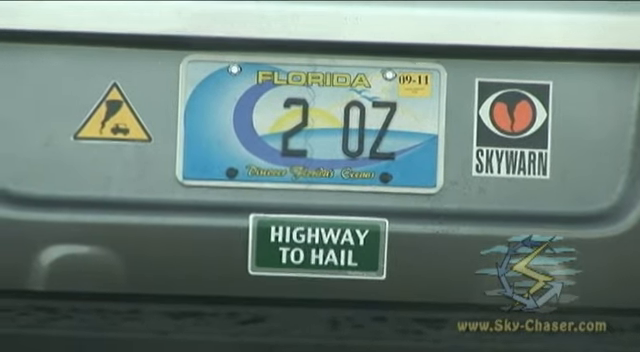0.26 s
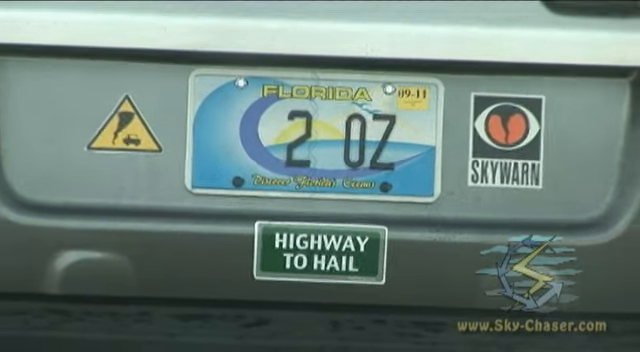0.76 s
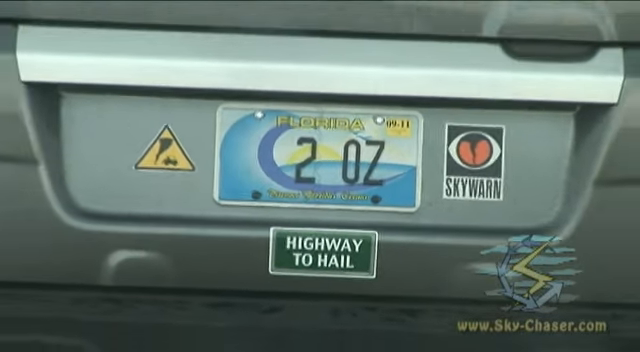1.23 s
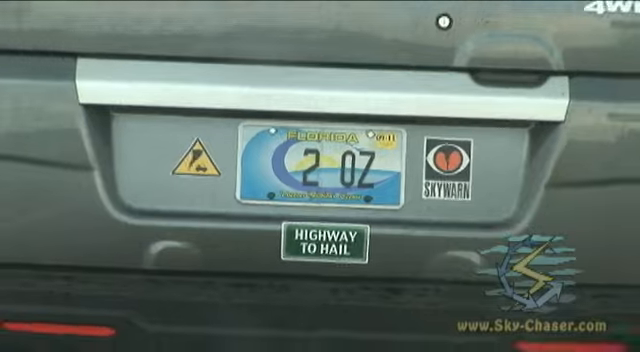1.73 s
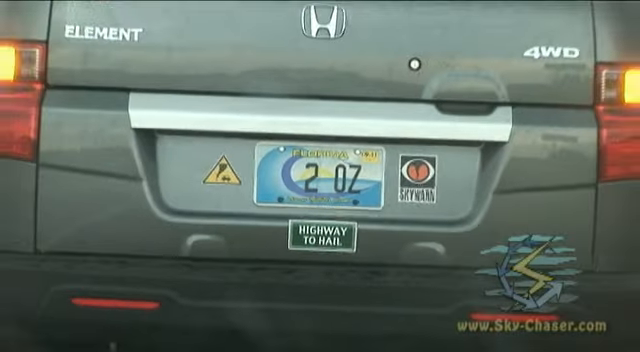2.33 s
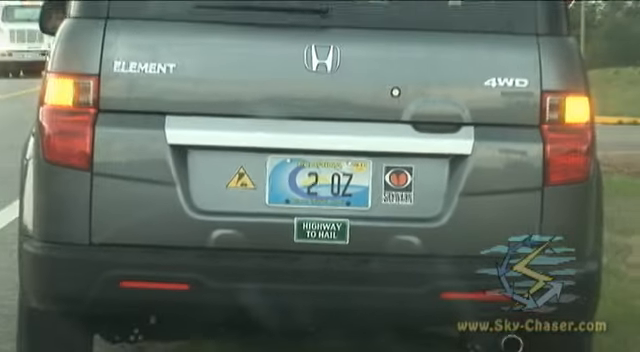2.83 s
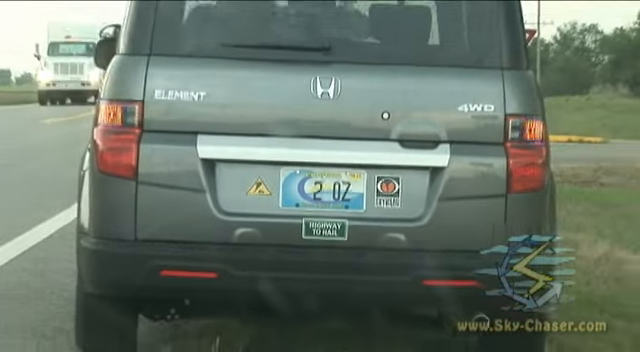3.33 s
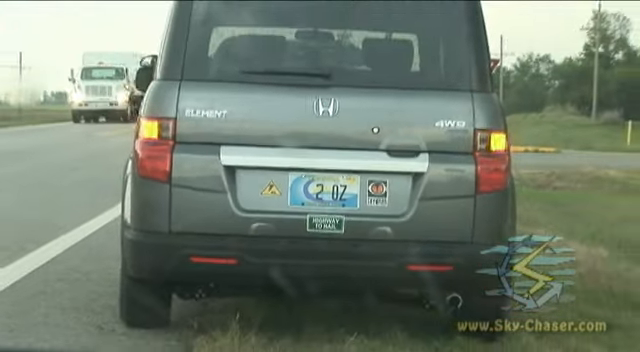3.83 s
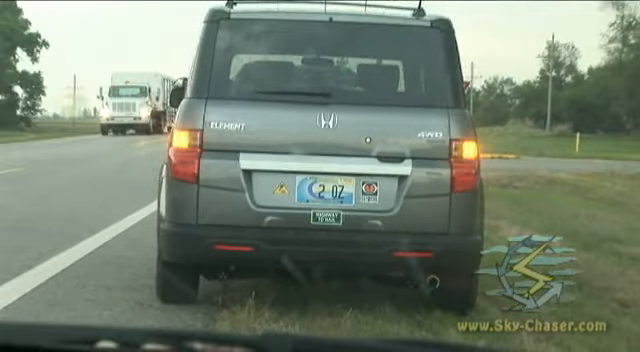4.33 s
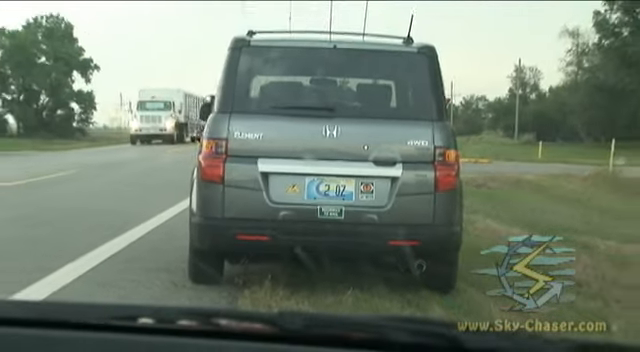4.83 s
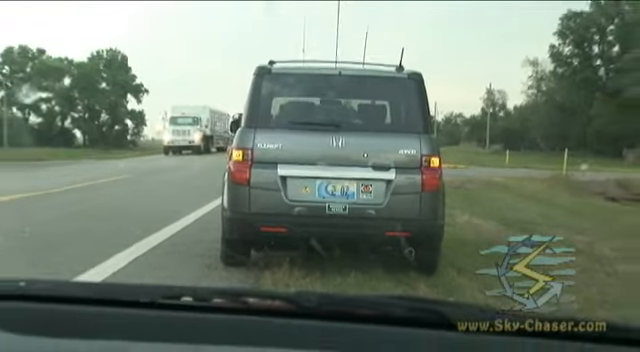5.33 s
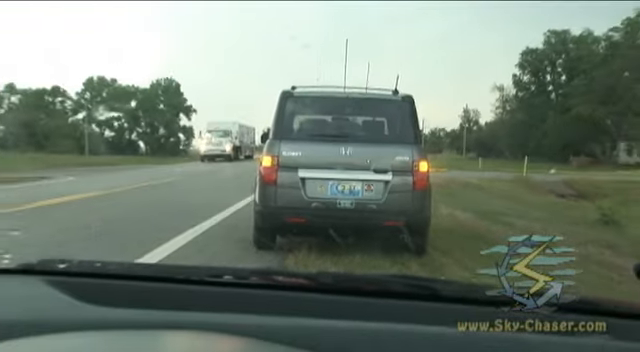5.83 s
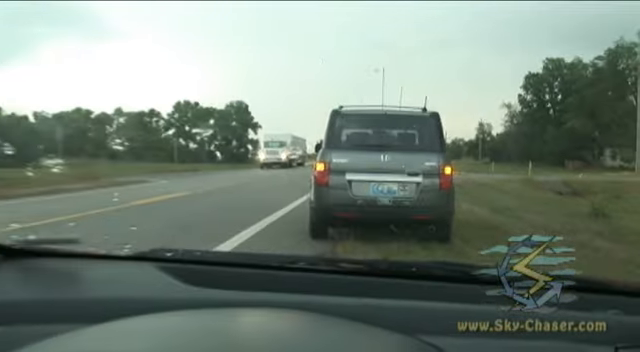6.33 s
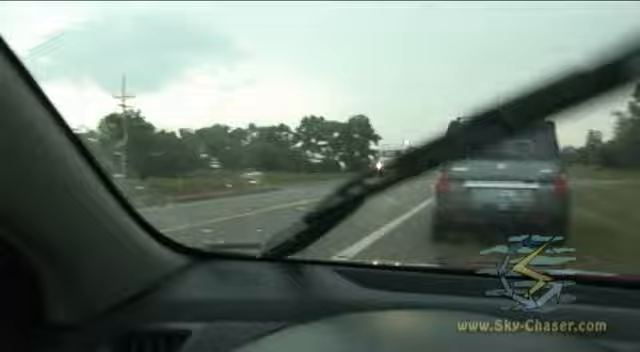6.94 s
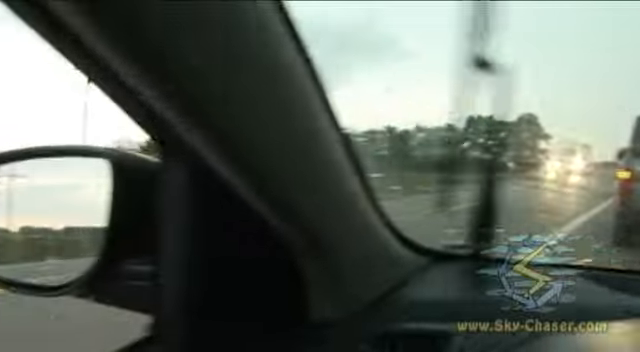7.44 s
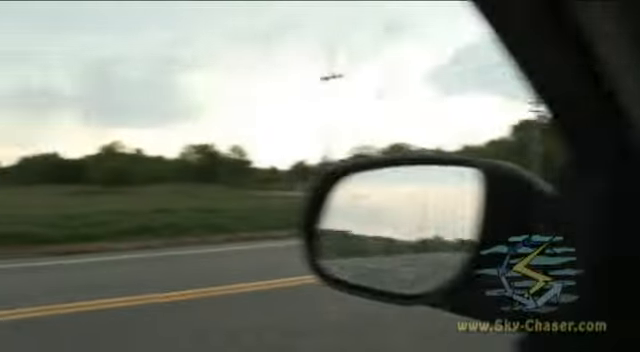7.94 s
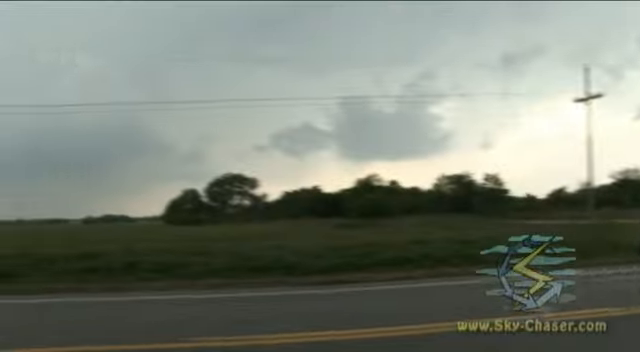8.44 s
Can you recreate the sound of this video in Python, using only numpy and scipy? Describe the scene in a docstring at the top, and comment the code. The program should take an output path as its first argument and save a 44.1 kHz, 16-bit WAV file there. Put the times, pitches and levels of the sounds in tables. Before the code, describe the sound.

From the driver's seat of an idling car, a quiet low engine drone and thin hiss run throughout, the drone rising slightly until about 5 s. Sparse heavy raindrops strike the roof from 0.25 s, each a hollow low thump of about a tenth of a second with a noisy edge, above softer drumming. Short crisp taps and tiny bright ticks scatter over the windshield. Roof hits cluster near 3 s and between 3.6 and 5.3 s; a strong glass tap lands at 5.1 s. At 6.7 s the wiper starts with a dull thud; at 7.4 s it reverses with a heavier, sinking thud and a clack. From 7 to 8 s the microphone turns to the side window and an oncoming truck's broad tyre noise swells gently. At 7.97 s a fat drop smacks the window frame, by far the loudest event, cracking and spattering briefly. Light taps continue to 8.7 s.

```python
"""Shower on an idling car

Inside a car on a road shoulder, over engine drone, sparse heavy drops ring the roof with low modes and
noisy overtones; taps on the windshield pair splashes of noise with two modes, among fine treble ticks.
The wiper thuds as it starts, thuds and clacks as it turns round; a fat drop smacks the frame and spatters.
The tyres of an oncoming truck, coloured noise, swell as the microphone turns to the side window."""
import sys
import numpy as np
from scipy import signal
from scipy.fft import rfft, irfft
from scipy.io import wavfile
from scipy.ndimage import uniform_filter1d

SR = 44100
rng = np.random.default_rng(int(sys.argv[2]) if len(sys.argv) > 2 else 0)


def generate_wav(sig):
    """Save sig (samples, or channels by samples) to the path in sys.argv[1] as 16-bit PCM at SR."""
    pcm = np.round(np.clip(np.atleast_2d(sig).T, -1, 1) * 32767).astype(np.int16)
    wavfile.write(sys.argv[1], SR, pcm)


N = 382788
TIME = np.arange(N) / SR  # seconds through the scene
AGE = np.arange(2 ** 14) / SR  # seconds since the start of one sound
# noisy overtones of the roof panel, also its edge: freq_hz, relative density_db (per Hz)
ROOF_OVERTONE_COLOUR = [(220, -5), (440, -9.5), (620, -19.5), (1300, -33.5), (3000, -65)]
TAP_RISE_SHARE = 0.047  # rise time as a share of t60: short taps snap


def undb(db):
    """Decibels to amplitude gain."""
    return 10 ** (np.asarray(db) / 20)


def curve(rows, at):
    """Straight lines through a two-column table."""
    return np.interp(at, *np.transpose(rows))


def gains(points, size):
    """Gain at each FFT bin from (freq_hz, level_db) points, falling 10 dB per octave beyond them."""
    hz, db = np.transpose(points)
    bin_hz = np.fft.rfftfreq(size, 1 / SR)
    octave, known = np.log2(np.maximum(bin_hz, 1)), np.log2(hz)
    octaves_outside = abs(octave - np.clip(octave, known[0], known[-1]))
    return undb(np.interp(octave, known, db) - 10 * octaves_outside)


def colour(x, points, size=4096):
    """Minimum-phase filter of the given colour: being causal, it keeps attacks sharp."""
    cepstrum = irfft(np.log(gains(points, size)))[:size // 2]
    cepstrum[1:] *= 2  # fold the spectrum's phase to minimum phase
    response = irfft(np.exp(rfft(cepstrum, size)))[:size // 2]
    return signal.oaconvolve(x, response[None], axes=1)[:, :x.shape[1]]


def level(x, db):
    """Set the rms level."""
    return x * undb(db) / np.sqrt(np.mean(x ** 2))


def peak(x, db, size=128):
    """Set the rms level of the loudest few milliseconds, judged on the first channel."""
    power = uniform_filter1d(np.atleast_2d(x)[0] ** 2, size)
    return x * undb(db) / np.sqrt(power.max())


def fade(t60):
    """Exponential decay by 60 dB in t60 seconds."""
    return np.exp(-np.log(1000) * AGE / t60)


def burst(t60, tail_db=-40, tail_t60=0.13, rise_s=0.000083, size=6000):
    """A contact spreading through a panel: mid and side noise with a quick decay and a faint tail."""
    decay = fade(t60) + undb(tail_db) * fade(tail_t60)
    shape = decay * (1 - np.exp(-AGE / rise_s))
    return rng.standard_normal((2, size)) * shape[:size]


def ring(hz, t60, rise_s):
    """One sine mode that builds up and dies away."""
    return np.sin(2 * np.pi * hz * AGE) * fade(t60) * (1 - np.exp(-(AGE / rise_s) ** 2))


def add(out, s, sound):
    """Mix a sound in at a time in seconds."""
    start = max(int(s * SR), 0)
    out[:, start:start + sound.shape[-1]] += sound[..., :N - start]


def patter(strike, spread_db, count, size=10):
    """Drops of random strength fall at random times on a few spots, each with its own response."""
    out = np.zeros((2, N))
    spots = [peak(strike(), 0) for _ in range(size)]
    weights = undb(spread_db * np.clip(rng.standard_normal(count), -2, 2))
    for k, s in enumerate(rng.random(count) * TIME[-1]):
        add(out, s, spots[k % size] * weights[k])
    return out


def turned(s):
    """How far the microphone has turned to the side window, 0-1."""
    return np.interp(s, (6.9, 8), (0, 1))


def surroundings():
    """Cabin drone and thin hiss as coloured noise; tyre noise grows as 1 / distance to the truck."""
    # engine drone in the cabin: freq_hz, relative density_db (per Hz)
    drone_colour = [(20, -28.5), (32, -1), (52, 0.5), (66, -9.5), (95, -4), (140, -8), (330, -19.5),
                    (700, -33), (6000, -70)]
    # drift of the drone: start_s, relative level_db
    rumble = [(0.0, -54.5), (2.2, -51.5), (5.1, -48), (6.3, -49), (8.68, -49.5)]
    # the truck's tyres: freq_hz, relative density_db (per Hz)
    tyre_colour = [(300, -0.5), (550, -1.5), (1100, -5.5), (1750, -3), (2350, -7.5), (2950, -12),
                   (3600, -15), (5800, -26.5), (7500, -43.5), (13000, -28)]
    # thin hiss: freq_hz, relative density_db (per Hz)
    hiss_colour = [(2000, 15), (3200, 2), (4300, 5), (5500, 6.5), (7200, -4), (9000, -1.5), (11000, 6.5),
                   (14500, 3), (15400, -16)]
    rumble_db = 9  # added to the drift
    truck_passes_s, truck_m_s, lane_m = 11.45, 16.2, 7.5  # when it would draw level, speed, nearest distance
    truck_db, turned_tyre_db = -44.5, 10  # tyres at the nearest distance; gain once the microphone has turned

    drone = level(colour(rng.standard_normal((2, N)), drone_colour), rumble_db)
    drone *= undb(curve(rumble, TIME))
    distance_m = np.hypot(truck_m_s * (TIME - truck_passes_s), lane_m)
    tyres = level(colour(rng.standard_normal((2, N)), tyre_colour), truck_db) * lane_m / distance_m
    tyres *= undb(turned_tyre_db * turned(TIME))
    hiss = level(colour(rng.standard_normal((2, N)), hiss_colour), -73.0)
    return drone + tyres + hiss


def droplets():
    """The tiniest drops are short noise ticks, high in the treble, over a fine patter of the same."""
    # tick colour: freq_hz, relative density_db (per Hz)
    tick_colour = [(3000, -21.5), (7000, -12), (10000, -7), (14000, 3), (16000, -14)]
    # the sharpest droplets: start_s, relative level_db
    sharp_ticks = [(0.086, -62), (0.899, -60.5), (1.3508, -47), (3.482, -63), (4.7444, -62),
                   (5.0723, -54.5), (5.6976, -57), (7.055, -56)]
    tick_db = 7  # added to every sharp tick

    def tick():
        """A tiny contact: noise that dies in milliseconds, with a faint tail."""
        return colour(burst(0.005, -26, 0.071, rise_s=0.0007), tick_colour)

    out = level(patter(tick, spread_db=5.5, count=380), -75.0)
    for s, db in sharp_ticks:
        add(out, s, peak(tick(), db + tick_db))
    return out


def glass_tap(hz, t60, dull_db=0):
    """Laminated glass is well damped: a short splash and two modes of the spot; higher spots are brighter."""
    # splash on glass before the tilt: freq_hz, relative density_db (per Hz)
    glass_colour = [(200, -13.5), (500, 5.5), (1300, 3.5), (2300, 0), (2850, -4.5), (3300, -1),
                    (4300, -13.5), (5600, -17), (7200, -34), (15000, -26)]
    bright_db, brighter_db_per_octave = 1, 4  # treble tilt of a 2 kHz spot; change with pitch
    ring_db, upper_mode_db, upper_mode_ratio = -6.5, -9.5, 1.62  # modes against splash; upper against lower

    tilt_db = bright_db + brighter_db_per_octave * np.log2(hz / 2000) - dull_db
    tilted = [(f, db + tilt_db * np.tanh(np.log2(f / 2000))) for f, db in glass_colour]
    rise_s = TAP_RISE_SHARE * t60
    splash = colour(burst(t60, -23.5, 0.15, rise_s=rise_s), tilted)
    upper_mode = undb(upper_mode_db) * ring(hz * upper_mode_ratio, t60, rise_s)
    modes = ring(hz, t60, rise_s) + upper_mode
    return peak(splash, 0) + peak(modes[:splash.shape[1]], ring_db) * [[1], [0]]  # modes in the mid only


def windshield():
    """Clear taps over a fine patter; each shakes the roof edge as the square of its strength."""
    # clear taps on the glass: drops, and the wiper's clack at 7.388 s
    # start_s, relative level_db, pitch_hz of the struck spot, t60_s
    clear_taps = [(0.112, -56, 3080, 0.043), (0.681, -52.5, 1400, 0.068), (0.761, -48, 2090, 0.04),
                  (1.109, -44.5, 1193, 0.05), (1.588, -54, 3250, 0.042), (1.948, -58, 2990, 0.031),
                  (2.404, -54.5, 1134, 0.047), (2.468, -54, 2460, 0.034), (2.487, -47, 2180, 0.018),
                  (2.772, -50, 3130, 0.037), (3.157, -46, 2050, 0.046), (3.235, -53.5, 3070, 0.043),
                  (3.711, -50, 1385, 0.037), (4.257, -53.5, 2100, 0.037), (4.282, -48, 960, 0.037),
                  (4.385, -53.5, 1900, 0.025), (4.461, -51.5, 1250, 0.026), (4.607, -48, 1880, 0.049),
                  (4.818, -48.5, 2380, 0.024), (4.971, -50, 1070, 0.04), (5.072, -45.5, 3110, 0.032),
                  (5.082, -42, 1660, 0.057), (5.116, -37.5, 1338, 0.063), (5.328, -51, 2720, 0.014),
                  (5.559, -51.5, 3200, 0.039), (6.032, -50.5, 3077, 0.066), (6.265, -48, 2720, 0.022),
                  (6.492, -51, 1305, 0.046), (6.519, -51, 1180, 0.038), (6.625, -55.5, 2160, 0.048),
                  (6.828, -52.5, 980, 0.12), (7.027, -51.5, 1480, 0.036), (7.099, -54, 2360, 0.089),
                  (7.135, -50.5, 1510, .04), (7.388, -44.5, 1190, .095), (7.599, -38.5, 1263, 0.044),
                  (7.711, -50, 1595, 0.038), (8.381, -46, 1705, 0.033), (8.61, -40.5, 1370, 0.036)]
    tap_db, turned_dull_db = 3.5, 5  # added to every clear tap; treble tilt lost as the microphone turns
    shake_t60_s, shake_db = 0.13, -32  # the shake's level equals the table's tap level at this level

    out = patter(lambda: glass_tap(rng.uniform(965, 2812), t60=0.042), spread_db=3.5, count=900, size=40)
    out = level(out, -64.0)
    for s, db, hz, t60 in clear_taps:
        add(out, s, peak(glass_tap(hz, t60, turned_dull_db * turned(s)), db + tap_db))
        shake = colour(burst(shake_t60_s, rise_s=TAP_RISE_SHARE * t60), ROOF_OVERTONE_COLOUR)
        add(out, s, peak(shake, 2 * db - shake_db))
    return out


def roof():
    """Drops bend the lined roof panel: a low ring with noisy overtones, over the drumming of smaller drops."""
    # drumming of small drops: freq_hz, relative density_db (per Hz)
    roof_colour = [(90, -15.5), (140, -12.5), (175, 2), (205, 7), (245, -4.5), (295, -17.5), (430, -17.5),
                   (570, -24), (640, -38), (720, -24.5), (1000, -34.5), (1600, -53.5)]
    # strength of the shower on the roof: start_s, relative level_db
    shower = [(0.0, -56), (0.29, -44), (1.85, -44.5), (2.92, -37), (3.34, -43.5), (3.67, -38.5),
              (5.75, -44), (6.09, -34.5), (6.5, -43), (7.16, -41), (8.68, -54)]
    # heavy drops: start_s, relative level_db of the low ring, relative level_db of the overtones
    roof_drops = [(0.254, -30, -48), (0.358, -30.5, -37), (0.441, -23.5, -33.5), (0.848, -33, -43.5),
                  (1.438, -26, -51), (1.714, -27.5, -39), (1.756, -27.5, -43), (2.663, -25.5, -36.5),
                  (2.94, -28, -49), (2.973, -27, -32.5), (3.024, -21.5, -31), (3.569, -22.5, -41),
                  (3.783, -25.5, -34), (4.125, -26, -52), (4.174, -25, -41.5), (4.396, -27.5, -50),
                  (4.548, -23.5, -43), (4.995, -21.5, -37.5), (5.079, -35, -30.5), (5.335, -23, -40.5),
                  (5.904, -26, -44), (5.972, -26, -35), (6.149, -26, -46), (6.887, -27.5, -43),
                  (8.225, -27.5, -55)]
    roof_hz, hz_spread = 200.9, 0.052  # pitch of the low ring; its spread as a share
    ring_trim_db, overtone_trim_db, patter_db = -2, -4, 4.5  # added to the table levels

    out = patter(lambda: colour(burst(0.092, rise_s=0.00055), roof_colour), spread_db=3.0, count=1200, size=30)
    out = level(out, patter_db) * undb(curve(shower, TIME))
    for s, ring_db, overtone_db in roof_drops:
        hz = roof_hz * (1 + hz_spread * rng.standard_normal())
        add(out, s, peak(ring(hz, t60=0.14, rise_s=0.0036), ring_db + ring_trim_db))
        overtones = colour(burst(0.35, rise_s=0.00084), ROOF_OVERTONE_COLOUR)
        add(out, s, peak(overtones, overtone_db + overtone_trim_db))
    return out


def wiper():
    """The linkage thuds through the bulkhead: low modes that sink in pitch, each with a dull rumble."""
    # thuds as it starts and turns round: start_s, relative level_db, initial pitch_hz, t60_s before slowing
    thuds = [(6.686, -36, 342, 0.14), (6.705, -24, 151, 0.21), (6.721, -32, 85, 0.34),
             (7.384, -33, 308, 0.093), (7.393, -14.5, 126.7, 0.16), (7.425, -20.5, 77.2, 0.57),
             (7.471, -27, 56, 0.25)]
    sag, sag_s = 0.205, 0.062  # share by which the pitch sinks as the arm slows; time constant

    out = np.zeros((2, N))
    slowed_age = np.cumsum(1 - sag * (1 - np.exp(-AGE / sag_s))) / SR
    for s, db, hz, t60 in thuds:
        thud = np.interp(slowed_age, AGE, ring(hz, t60, rise_s=0.0019))
        add(out, s, peak(thud, db - 4.0))
        body = [(hz / 2, -11), (hz, 0), (2 * hz, -5), (4 * hz, -24), (8 * hz, -40)]
        dull_rumble = colour(burst(t60, -35, 0.27, rise_s=0.0036, size=len(AGE)), body)
        add(out, s, peak(dull_rumble, db - 6.0))
    return out


def fat_drop():
    """A hard smack close by rings the frame's modes; a bright noise crack and a short spatter follow."""
    # modes of the window frame: pitch_hz, relative level_db, t60_s
    frame = [(166.4, -17, 0.115), (380, 2, 0.0093), (810, -10, 0.0078), (1120, -0.5, 0.019),
             (1600, 11, 0.0022), (2430, 2.5, 0.011), (3170, -18, 0.015)]
    # the smack and its splash back: start_s, level_db of the knock
    smack = [(7.9661, -9), (7.986, -23)]
    # crack of the bursting drop: freq_hz, relative density_db (per Hz)
    crack_colour = [(500, -26), (2000, -5), (3150, 9), (4300, -7), (5900, -0.5), (7200, -16), (10800, -12),
                    (16000, -10)]
    # spray: freq_hz, relative density_db (per Hz)
    spatter_colour = [(200, 14), (900, 5), (2400, 4), (4000, -9), (5500, 0), (7500, -34), (13000, -14)]
    burst_s, burst_db = 7.9716, -15  # the drop bursts just after it lands
    spatter_db, hold_s, release_s = -32, 0.06, 0.0096  # held spray before its side is halved
    onset_db, onset_t60_s = 16, 0.018  # the first rush of spray, over the held level

    out = np.zeros((2, N))
    knock = np.zeros(len(AGE))
    for k, (hz, db, t60) in enumerate(frame):
        knock += (-1) ** k * undb(db) * ring(hz, t60, rise_s=0.00049)
    for s, db in smack:
        add(out, s, peak(knock, db) * [[1], [0]])  # so near that it is all mid
        add(out, s, peak(colour(burst(0.016), crack_colour), db - 14.0))
    crack = colour(burst(0.0028, rise_s=0.0011), crack_colour)[0]
    add(out, burst_s, peak(crack, burst_db) * [[1], [-.3]])  # to the right

    # the spray lands in tiny clumps of 64 samples
    clumps = np.repeat(undb(3.4 * rng.standard_normal(len(AGE))), 64)[:len(AGE)]
    spray = colour(rng.standard_normal((2, len(AGE))) * clumps, spatter_colour)
    spatter = level(spray, spatter_db) * [[1], [.5]]
    held = np.clip(1 - (AGE - hold_s) / release_s, 0, 1)
    rush = 1 + undb(onset_db) * fade(onset_t60_s)
    add(out, burst_s, spatter * held * rush)
    return out


def cabin(x, echo_db=-12, t60=0.092):
    """Reflections from windows and dashboard, a decaying noise response, ripple the colour of the sound."""
    echoes = signal.sosfilt(signal.butter(2, 400, "high", fs=SR, output="sos"), burst(t60))
    echoes *= undb(echo_db) / np.linalg.norm(echoes[0])
    reflected = signal.fftconvolve(x, echoes, axes=1)[:, :N]
    return (x + reflected) / np.hypot(1, undb(echo_db))


def stereo(pair):
    """Mid and side to left and right; a weak side in the bass fills the cabin evenly."""
    # width of the cabin sound: freq_hz, side gain_db
    width = [(60, -22.5), (200, -21), (380, -4.5), (700, -1.5), (1300, -1.5), (2400, -11.5), (4400, 0.5),
             (8000, 5), (15000, -5)]
    side = colour(pair[1:], width)[0]
    return np.array([pair[0] + side, pair[0] - side])


def scene():
    """Everything as heard from the driver's seat; ticks, wiper thuds and fat drop skip the reflections."""
    reflected = cabin(roof() + windshield() + surroundings())
    return stereo(reflected + droplets() + wiper() + fat_drop())


def record(dry):
    """Clip at full scale, then cut the top treble with a steep low-pass."""
    top_hz = 15800
    lowpass = signal.ellip(8, .2, 80, top_hz, fs=SR, output="sos")
    return signal.sosfilt(lowpass, np.clip(dry, -1, 1))


dry = scene()
out = record(dry)
generate_wav(out)
```